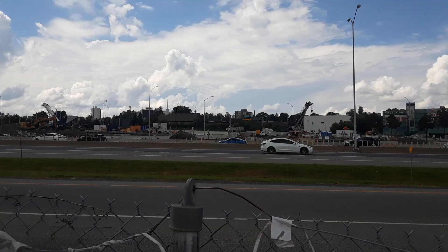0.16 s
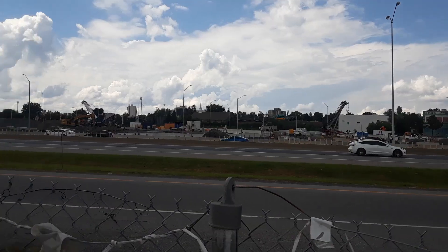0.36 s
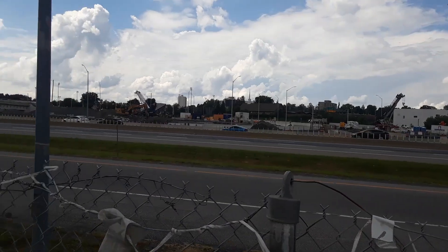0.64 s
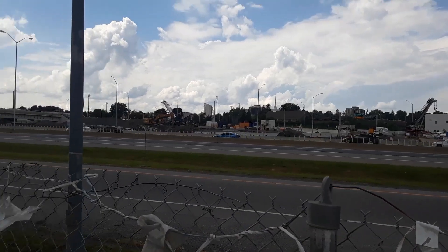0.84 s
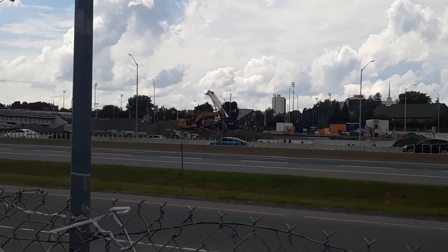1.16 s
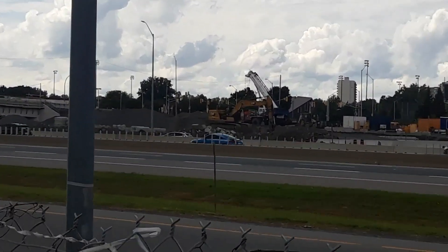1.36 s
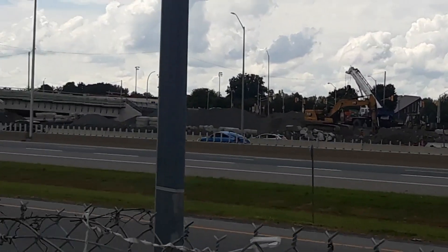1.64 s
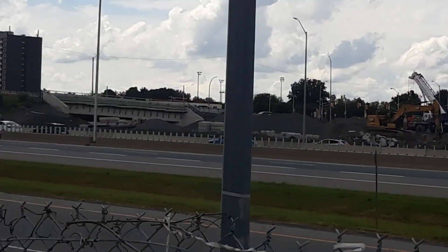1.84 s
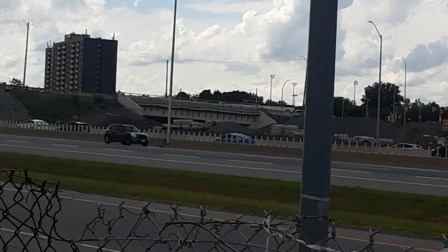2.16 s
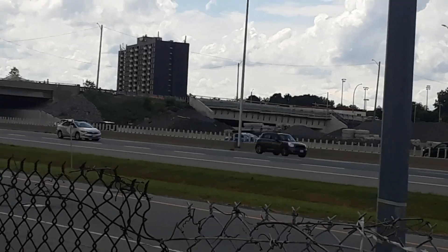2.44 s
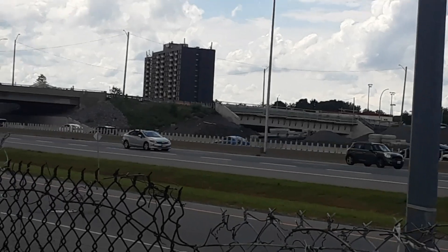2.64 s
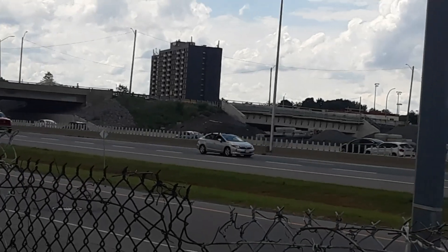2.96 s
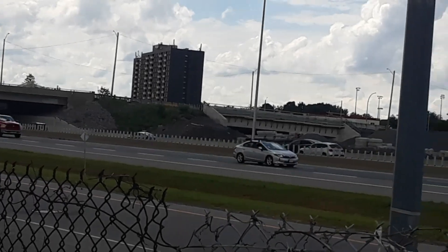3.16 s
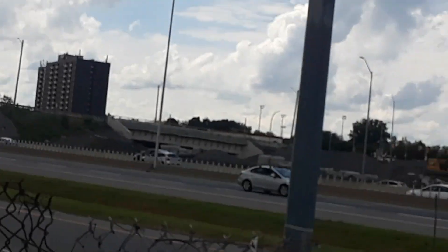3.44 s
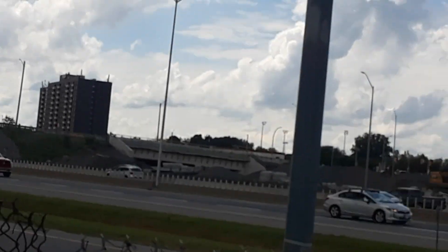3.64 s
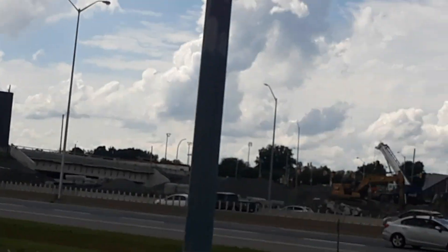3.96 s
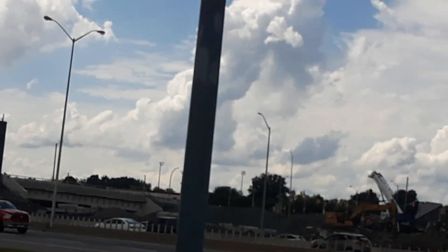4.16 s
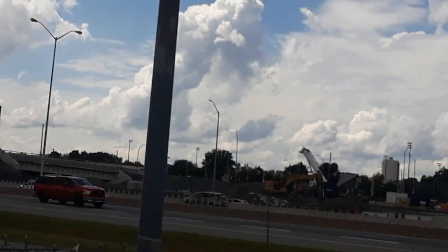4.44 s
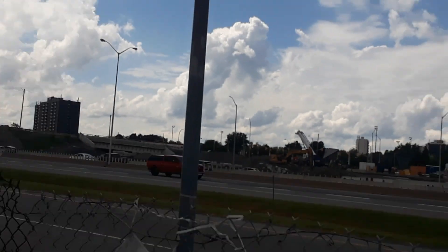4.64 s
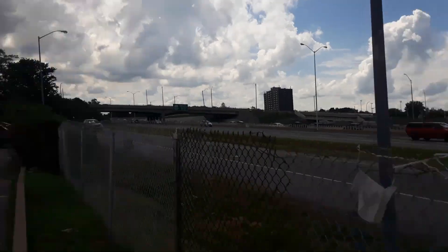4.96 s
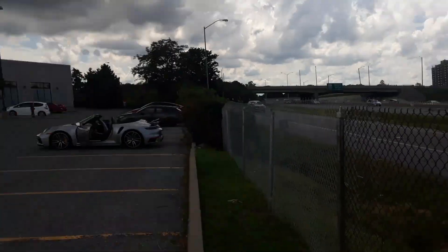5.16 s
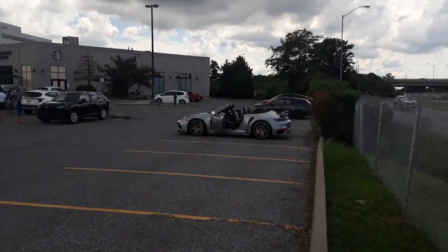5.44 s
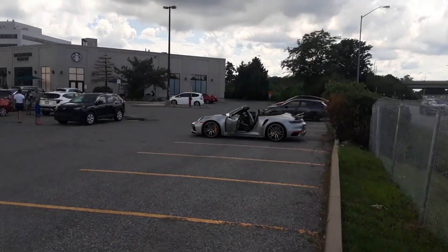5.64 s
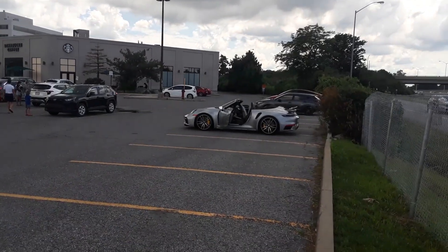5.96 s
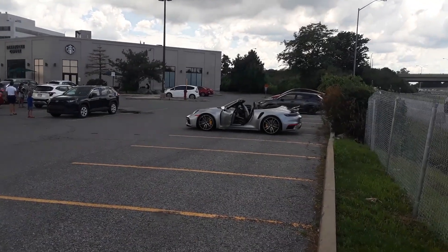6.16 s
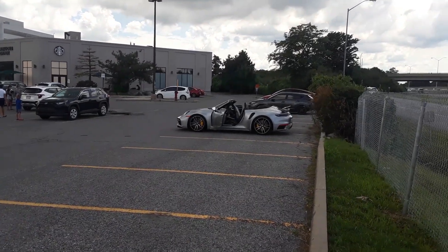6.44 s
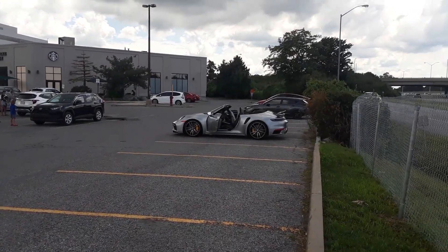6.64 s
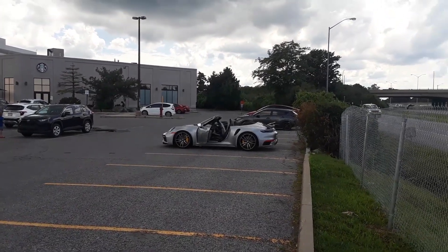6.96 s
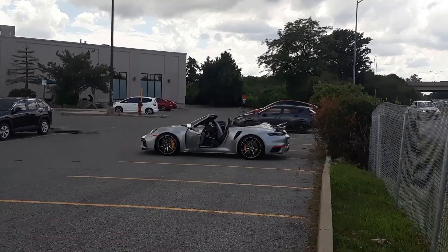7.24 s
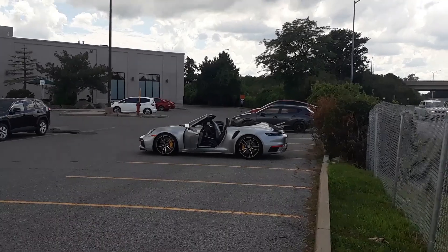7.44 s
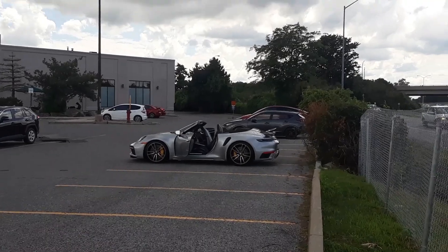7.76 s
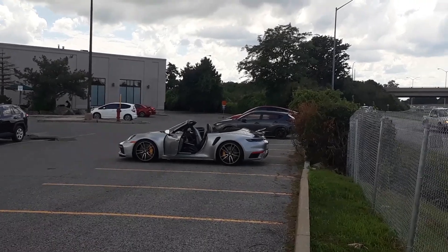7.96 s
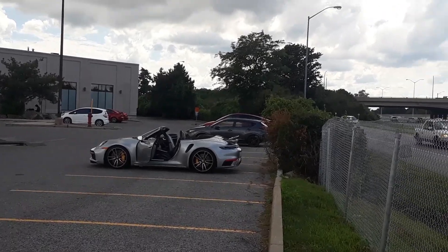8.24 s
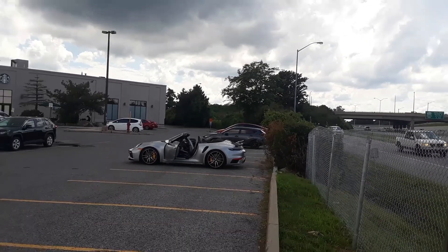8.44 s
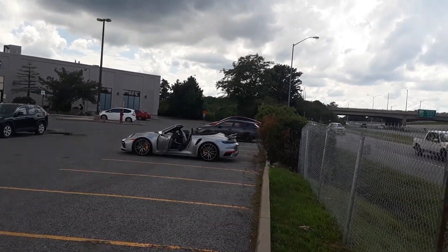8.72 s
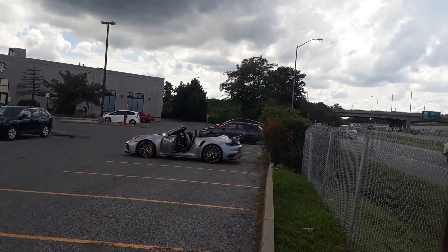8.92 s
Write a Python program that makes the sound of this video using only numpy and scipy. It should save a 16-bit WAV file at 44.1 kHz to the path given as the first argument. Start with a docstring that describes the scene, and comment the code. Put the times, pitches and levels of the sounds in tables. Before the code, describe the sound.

A lumpy wind gust fades in a fraction of a second, a tiny silent cut follows, then dense highway traffic starts abruptly: low engine rumble, mid tyre roar, whine and soft hiss. Single cars swell and fade, wind thumps knock one side or the other of the handheld phone. In the last third a vehicle draws near with a rising tyre note and quick regular slaps, still loud at the end.

```python
"""Busy highway on a hand-held phone

Two microphone ports beside traffic: shaped noise bands rumble, roar and hiss, arriving first at the right.
A vehicle draws near: a swelling tyre note, and noise bursts for something slapping on a wheel once a turn.
Enveloped low noise makes wind puffs, single pressure cycles make thumps on one port or the other.
It opens with a fading gust (lumpy noise) in a quieter place and a short silent cut."""
import sys
import numpy as np
from scipy import signal
from scipy.fft import rfft, irfft, next_fast_len
from scipy.io import wavfile
from scipy.ndimage import uniform_filter1d, map_coordinates

SR = 44100
rng = np.random.default_rng(int(sys.argv[2]) if len(sys.argv) > 2 else 0)


def digitize_waveform(pressure):
    """Quantize a signal to 16-bit integers and store it at the path in sys.argv[1].

    Rows of a 2-D input are taken as channels; values are limited to [-1, 1].
    """
    field = np.atleast_2d(pressure).T
    bounded = np.clip(field, -1, 1)
    quanta = np.round(bounded * 32767).astype(np.int16)
    wavfile.write(sys.argv[1], SR, quanta)


def undo_db(level):
    """Turn decibels back into plain size, where 20 dB means ten times bigger."""
    steps = np.asarray(level, float) / 20
    return 10 ** steps


N = 400869


def unit(x):
    """Scale to rms 1."""
    return x / np.sqrt(np.mean(np.abs(x) ** 2) + 1e-20)


def along(points, hz):
    """(f/Hz, value) points read on a log frequency axis."""
    f, v = np.transpose(points)
    return np.interp(np.log(hz + 1), np.log(f + 1), v)


def curves(rows, t):
    """Each column after the time, read at times t."""
    s, *cols = np.transpose(rows)
    return [np.interp(t, s, c) for c in cols]


def wobble(t, rate):
    """A smooth random curve, rate knots a second, zero past its 150 knots."""
    return map_coordinates(rng.standard_normal(150), t[None] * rate)


def coloured(spectrum, size, channels=2):
    """Unrelated noises of joint rms 1 with the given spectrum."""
    m = next_fast_len(size + 8192)
    gain = undo_db(along(spectrum, np.fft.rfftfreq(m, 1 / SR)))
    noise = irfft(rfft(rng.standard_normal((channels, m))) * gain, m)
    return unit(noise[:, :size])


def ports(x, pan_db, late_s):
    """One sound at both ports: the left one is farther from the road."""
    late = round(late_s * SR)
    left = np.pad(x, (late, 0))[:len(x)]
    return np.array([left * undo_db(pan_db / 2), x * undo_db(-pan_db / 2)])


def band(shape, db):
    """Power density of the given shape with rms level db."""
    return shape / shape.mean(0) * undo_db(2 * db)


def spectrum_power(spectrum, hz):
    """Power shape from a spectrum in dB."""
    return undo_db(2 * along(spectrum, hz))


def hump(hz, centre_hz, width):
    """Bell-shaped power on a log frequency axis; width in nepers."""
    return np.exp(-(np.log((hz + 1) / centre_hz) / width) ** 2)


# gust and quiet floor from t = 0 to the cut; silence: [from t/s, to t/s]
CUT_S = (.1699, .2538)
# opening gust: [t/s, left level/dB, right level/dB, flap level/dB]
GUST_LEVELS = [(0, -11.5, -15, -42), (.02, -17.5, -24.5, -34), (.04, -17, -18.5, -35.5),
               (.07, -22, -20.5, -40), (.1, -29, -43.5, -51), (.125, -46, -27, -37), (.15, -58, -48, -44),
               (.168, -30, -37, -46)]
# gust spectrum: [f/Hz, level/dB]
GUST_SPECTRUM = [(24, -79), (40, -33.5), (200, -19.5), (284, -1.5), (329, -6), (466, -6.5), (514, -21.5),
                 (568, -11.5), (888, -33), (8070, -91), (15000, -76)]
# brighter flapping spectrum: [f/Hz, level/dB]
FLAP_SPECTRUM = [(100, -62), (500, -5), (900, -3), (1400, -11.5), (2000, -24), (6000, -120)]
# quiet floor spectrum: [f/Hz, level/dB]
QUIET_SPECTRUM = [(24, -46), (40, 2), (233, 3.5), (443, -20), (1570, -27), (2170, -18), (4790, -34),
                  (8270, -50), (15000, -63.5)]


def opening():
    """A lumpy gust on both ports falls away over a quiet floor; brighter flapping shares its lumps."""
    t = np.arange(round(CUT_S[0] * SR)) / SR
    size = len(t)
    left_db, right_db, flap_db = curves(GUST_LEVELS, t)
    lumps = np.array([wobble(t, rate=136), wobble(t, rate=75)])
    gust = undo_db([left_db, right_db]) * unit(undo_db(2.5 * lumps) * coloured(GUST_SPECTRUM, size))
    flap = undo_db(flap_db) * unit(undo_db(5.2 * lumps) * coloured(FLAP_SPECTRUM, size))
    floor = undo_db(-38) * coloured(QUIET_SPECTRUM, size)
    return np.pad(gust + flap + floor, ((0, 0), (0, N - size)))


# traffic stream, also read by tyres and hiss:
# [t/s, engine rumble level/dB, tyre roar level/dB, tread whine level/dB, spray hiss level/dB]
TRAFFIC_LEVELS = [(.26, -34, -24.5, -25.5, -50.5), (.55, -30.5, -24.5, -23.5, -46.5),
                  (1.07, -29, -23.5, -22.5, -46.5), (1.6, -30, -23.5, -24.5, -50.5),
                  (2.4, -30, -21.5, -24.5, -49.5), (2.85, -31.5, -23, -21.5, -45.5),
                  (3.1, -29, -25, -24.5, -49), (3.33, -34, -21.5, -22, -44.5),
                  (3.7, -28, -24.5, -22.5, -47), (3.95, -29.5, -22, -23.5, -44),
                  (4.6, -27, -29, -20, -45.5), (5.23, -27, -26.5, -22, -45), (5.84, -28, -25.5, -24.5, -49),
                  (6.7, -29.5, -23, -23, -43.5), (7.39, -26.5, -24, -22, -42.5),
                  (7.9, -25.5, -21.5, -22.5, -44), (8.5, -26, -23, -22, -41.5), (9.09, -24, -27, -20, -40)]
# drifting exhaust drone over a low engine hum: [t/s, drone f/Hz, drone level/dB, hum level/dB]
DRONE_HUM = [(.26, 300, -37, -39), (2, 307, -38, -38.5), (3, 314, -33, -36), (4, 278, -30, -34.5),
             (5.2, 314, -31, -40), (6, 298, -30, -42), (7, 222, -31.5, -31), (7.4, 244, -28.5, -31),
             (8, 241, -42, -31), (8.5, 217, -25.5, -27), (9.09, 197, -28, -34.5)]
# engine rumble spectrum: [f/Hz, level/dB]
RUMBLE_SPECTRUM = [(20, -17.5), (70, 4), (120, -0.5), (170, 6.5), (250, 3), (400, 1), (550, -7.5),
                   (900, -15.5), (1500, -38.5), (4000, -120)]


def engines(hz, t):
    """Engines sum to a broad rumble, a drifting exhaust drone and a narrow hum."""
    hum_hz = 119.6
    rumble_db = curves(TRAFFIC_LEVELS, t)[0]
    drone_hz, drone_db, hum_db = curves(DRONE_HUM, t)
    rumble = band(spectrum_power(RUMBLE_SPECTRUM, hz), rumble_db + 0.51 * wobble(t, rate=9))
    drone = band(hump(hz, drone_hz, width=.15), drone_db + 0.33 * wobble(t, rate=8.3))
    hum = band(hump(hz, hum_hz, width=0.05), hum_db + 1.1 * wobble(t, rate=18))
    return rumble + drone + hum


# nearing vehicle, also read by slaps: [t/s, tyre note f/Hz, note level/dB, slap level/dB, slap centre f/Hz]
NEARING_VEHICLE = [(5.7, 880, -45, -45, 5400), (6.6, 840, -29, -44, 5400), (7.05, 770, -25.5, -35.5, 5500),
                   (7.35, 845, -25.5, -37.5, 5170), (7.7, 850, -25.5, -32, 5400),
                   (7.95, 840, -26.5, -31, 5640), (8.2, 840, -23, -27.5, 5770),
                   (8.45, 840, -21.5, -26.5, 5650), (8.52, 844, -21.5, -21.5, 5650),
                   (8.65, 830, -15.5, -23, 5450), (8.78, 814, -17, -16.5, 5100),
                   (8.9, 830, -18.5, -19, 5150), (9.09, 822, -18, -18, 5160)]
# tread whine spectrum: [f/Hz, level/dB]
WHINE_SPECTRUM = [(200, -120), (600, -7.5), (1000, 1), (1400, 0.5), (2000, -2.5), (2600, -8), (3200, -17.5),
                  (4000, -25), (5000, -73), (9000, -120)]


def tyres(hz, t, flutter):
    """Tyres sum to a slowly sinking roar and a tread whine; the nearing vehicle adds its own note."""
    roar_start_hz, roar_sag_hz_per_s = 912, 9.4
    roar_hz = roar_start_hz - roar_sag_hz_per_s * t
    roar_db, whine_db = curves(TRAFFIC_LEVELS, t)[1:3]
    note_hz, note_db = curves(NEARING_VEHICLE, t)[:2]
    roar_db = roar_db + .5 * flutter + 0.21 * wobble(t, rate=15)
    whine_db = whine_db + .5 * flutter + 0.17 * wobble(t, rate=13.0)
    roar = band(hump(hz, roar_hz, width=0.55), roar_db)
    note = band(hump(hz, note_hz, width=0.15), note_db + .5 * flutter)
    whine = band(spectrum_power(WHINE_SPECTRUM, hz), whine_db)
    return roar + note + whine


# single cars' tyre notes: [loudest t/s, time to fall 6 dB t/s, note f/Hz, level/dB]
CAR_PASSES = [(.9, .4, 970, -27.5), (2, 0.21, 980, -31.5), (2.8, 0.16, 1240, -29),
              (3.35, 0.35, 1110, -26.5), (4.3, 0.29, 870, -29), (4.85, 0.88, 896, -28.5)]
# short rising tyre swishes: [loudest t/s, half length t/s, from f/Hz, to f/Hz, level/dB]
TYRE_SWISHES = [(4.397, 0.079, 1400, 2140, -23.5), (4.81, 0.063, 1700, 2200, -27),
                (5.195, 0.093, 1870, 2320, -27.5), (7.396, 0.15, 1800, 2180, -26.5)]


def passes(hz, t, flutter):
    """Single cars' narrow tyre notes swell and fade; shorter swishes also rise in pitch."""
    power = 0
    for s, length_s, pass_hz, db in CAR_PASSES:
        u = (t - s) / length_s
        power = power + band(hump(hz, pass_hz, width=0.091), db - 6 * u ** 2 + .5 * flutter)
    for s, length_s, from_hz, to_hz, db in TYRE_SWISHES:
        u = (t - s) / length_s
        swish_hz = np.interp(u, [-1, 1], [from_hz, to_hz])
        power = power + band(hump(hz, swish_hz, width=0.12), db - 6 * u ** 2)
    return power


# hiss centre, moving as the phone turns: [t/s, f/Hz]
HISS_CENTRE_HZ = [(0.26, 5070), (0.62, 4830), (3.04, 5200), (3.26, 5470), (4.15, 4870), (4.27, 5200),
                  (6.25, 5030), (7.5, 5150)]
# hiss spectrum, before shifting to its centre: [f/Hz, level/dB]
HISS_SPECTRUM = [(800, -120), (2000, -19.5), (3000, -12), (4200, -7.5), (5300, -5), (6200, -8.5),
                 (7200, -17), (8500, -30), (10000, -60), (14000, -120)]
# faint top, relative to hiss: [t/s, air level/dB, sheen level/dB]
TOP_LEVELS = [(.3, -32, -30.5), (2.35, -33, -27.5), (3.1, -32.5, -28), (3.5, -29, -28.5), (5.3, -28.5, -27),
              (6, -28, -31), (7.1, -27, -23), (8.3, -23, -20.5), (9.09, -23.5, -27.5)]
# air spectrum: [f/Hz, level/dB]
AIR_SPECTRUM = [(3000, -120), (6000, -30), (8000, -6), (9000, -1), (10500, 1), (12000, 2.5), (13500, -13.5),
                (15500, -8.5), (17000, -41)]
# sheen at the ports' high resonance, also read by slaps: [f/Hz, level/dB]
SHEEN_SPECTRUM = [(8000, -120), (11500, -19), (13000, 0), (14000, -1), (15600, -11), (17000, -38.5)]


def hiss(hz, t, flutter):
    """Spray hiss with a moving centre, topped by faint air and the ports' high resonance."""
    tabled_centre_hz = 5300
    hiss_db = curves(TRAFFIC_LEVELS, t)[3]
    air_db, sheen_db = curves(TOP_LEVELS, t)
    shifted_hz = hz * tabled_centre_hz / curves(HISS_CENTRE_HZ, t)[0]
    spray_db = hiss_db + 0.35 * flutter + 0.8 * wobble(t, rate=12)
    air_db = hiss_db + air_db + .7 * flutter + 1.1 * wobble(t, rate=15)
    sheen_db = hiss_db + sheen_db + .7 * flutter + 1.1 * wobble(t, rate=10)
    spray = band(spectrum_power(HISS_SPECTRUM, shifted_hz), spray_db)
    air = band(spectrum_power(AIR_SPECTRUM, hz), air_db)
    sheen = band(spectrum_power(SHEEN_SPECTRUM, hz), sheen_db)
    return spray + air + sheen


# direction and nearness: [t/s, left port delay/ms, share from one direction/0-1, left-right level/dB]
BEARINGS = [(.26, 0.39, .8, 0.5), (1, 0.43, 1, 0.6), (2, 0.33, 0.81, -0.5), (3, 0.29, 0.55, -0.5),
            (4, 0.35, 0.62, 0), (5, 0.37, 0.73, 0.3), (6, 0.3, 0.78, 0.5), (7, 0.35, 0.91, 0.6),
            (8, 0.33, 0.86, 0.3), (9.09, 0.28, 0.97, 0)]
# likeness of the ports after scatter from lanes and walls: [f/Hz, likeness/0-1]
PORT_LIKENESS = [(60, 1), (300, 1), (700, .99), (1100, .87), (1700, .72), (2500, .38), (3500, .15),
                 (4800, .3), (6200, .1), (14000, .05)]
# long waves bend round the phone and arrive less late: [f/Hz, share of delay/0-1]
DELAY_SHARE = [(100, 0.36), (500, 0.66), (900, 0.72), (1300, 0.8), (1800, 0.96)]
# ports sit differently in the phone body: [f/Hz, extra left-right level/dB]
PORT_TILT_DB = [(60, -1), (300, -0.5), (900, 1), (2500, 1.5), (3300, -1), (5000, 5), (9000, 1), (14000, 3)]


def at_ports(noise, hz, t):
    """Two noise spectra become partly alike ports with a delay and a level difference."""
    late_ms, direct, pan_db = curves(BEARINGS, t)
    likeness = along(PORT_LIKENESS, hz) * direct ** np.clip(hz / 900, 0, 1)
    turn = np.arccos(np.clip(likeness, 0, 1)) / 2
    mid, side = noise[0] * np.cos(turn), noise[1] * np.sin(turn)
    # half of the delay on each side
    lag = np.exp(-1j * np.pi * hz * along(DELAY_SHARE, hz) * late_ms / 1000)
    pan_db = pan_db + along(PORT_TILT_DB, hz)
    left = (mid + side) * lag * undo_db(pan_db / 2)
    right = (mid - side) / lag * undo_db(-pan_db / 2)
    return np.array([left, right])


def traffic():
    """Many vehicles sum to noise; each part of their sound has its own band, swell and flutter."""
    frame = 2048
    hz, t, noise = signal.stft(rng.standard_normal((2, N)), SR, nperseg=frame)
    hz = hz[:, None]
    # turbulent air on the way shakes most tyre bands and the hiss together
    flutter = wobble(t, rate=7.6)
    power = engines(hz, t) + tyres(hz, t, flutter) + hiss(hz, t, flutter) + passes(hz, t, flutter)
    patches = uniform_filter1d(rng.standard_normal(power.shape), size=14, axis=0)
    patches = unit(uniform_filter1d(patches, size=4, axis=1))
    shaped = at_ports(noise, hz, t) * np.sqrt(power) * undo_db(0.8 * patches)
    return signal.istft(shaped, SR, nperseg=frame)[1][:, :N]


# longer wind puffs: [onset t/s, peak level/dB, left-right level/dB, length t/s]
WIND_PUFFS = [(1.771, -22, 21, 0.037), (3.285, -25, -27, 0.041), (3.328, -17.5, -16, .05),
              (3.45, -22, -13, 0.11), (3.61, -16, -29, 0.038), (3.653, -25, -20, 0.024),
              (3.706, -17, -16, 0.042), (4.63, -14.5, 2, .078), (4.925, -18, -11, 0.0087),
              (5.208, -14, -16, 0.033)]
# wind spectrum: [f/Hz, level/dB]
BUFFET_SPECTRUM = [(20, -15), (50, -9), (110, 5.5), (250, -3.5), (450, -8), (900, -13.5), (2000, -78),
                   (5000, -120)]


def puffs():
    """Eddies buffet mostly one port; a faint buffeting, unrelated between ports, runs under them."""
    t = np.arange(N) / SR
    envelope = np.ones((2, N)) * undo_db(-42.0)
    for s, db, pan_db, length_s in WIND_PUFFS:
        u = np.clip((t - s) / length_s, 0, 30)
        swell = np.e * 2 * u * np.exp(-2 * u)  # peaks at 1, half a length in
        rms_db = db - 11.5  # noise rms lies below its peak
        envelope = envelope + undo_db(rms_db + np.array([[pan_db], [-pan_db]]) / 2) * swell
    return envelope * coloured(BUFFET_SPECTRUM, size=N)


# single sharp eddies: [t/s, peak level/dB, port/0 left 1 right]
EDDY_THUMPS = [(2.379, -11, 0), (2.434, -12, 0), (3.253, -4.5, 1), (3.859, -11, 1), (3.903, -13, 0)]


def thumps():
    """Each eddy is one push and rebound of pressure on one port, inward or outward by chance."""
    half_push_to_rebound_s = .0012
    t, out = np.arange(N) / SR, np.zeros((2, N))
    for s, db, port in EDDY_THUMPS:
        u = (t - s) / half_push_to_rebound_s
        out[round(port)] += rng.choice([-1, 1]) * undo_db(db) * u * np.exp((1 - u * u) / 2)
    return out


def blow(t, t60_s):
    """A burst envelope from t = 0: fast rise, then a fall by 60 dB at t60_s."""
    rise = 1 - np.exp(-np.abs(t) / 0.0014)
    return (t > 0) * rise * undo_db(-60 * (np.abs(t) / t60_s) ** 1.36)


# wheel rotation: [t/s, whole turns completed]
WHEEL_TURNS = [(6.929, 0), (7.1303, 3), (7.4697, 8), (7.749, 12), (7.89, 14), (8.106, 17), (8.2448, 19),
               (8.515, 23), (8.7838, 27), (9.0523, 31)]
# slap spectrum: [f/multiple of slap centre, level/dB]
SLAP_SPECTRUM = [(.1, -120), (.3, -33), (.65, -16), (.82, -9), (1, -5), (1.15, -9.5), (1.28, -17),
                 (1.5, -33.5), (2.3, -120)]
# slap's high sizzle spectrum: [f/Hz, level/dB]
SIZZLE_SPECTRUM = [(3000, -120), (6000, -37), (8000, -6.5), (9000, -11.5), (10500, -6), (12000, -6.5),
                   (14000, -7.5), (15600, -6), (17000, -35)]


def slaps():
    """A sharp hissing slap each wheel turn, weaker rattles following within the turn, partly scattered."""
    left_late_s = .000363
    scatter_db, scatter_pitch_share, top_scatter_db = 1.5, .04, 3.5  # from turn to turn
    sizzle_db, sheen_db = -23, -20.5  # relative to slap
    t = np.arange(SR // 10) / SR
    size = len(t)
    out = np.zeros((2, N + SR))
    when_s, turns = np.transpose(WHEEL_TURNS)
    times_s = np.interp(np.arange(turns[-1] + 1), turns, when_s)
    for s, db, centre_hz in zip(times_s, *curves(NEARING_VEHICLE, times_s)[-2:]):
        luck = rng.standard_normal(7)
        centre_hz = centre_hz * np.exp(scatter_pitch_share * luck[-1])
        direct, *scatter = coloured(np.multiply(SLAP_SPECTRUM, [centre_hz, 1]), size, channels=3)
        body = ports(direct, pan_db=3, late_s=left_late_s) + 1.02 * np.array(scatter)
        sizzle = undo_db(sizzle_db) * coloured(SIZZLE_SPECTRUM, size)
        sheen = undo_db(sheen_db) * coloured(SHEEN_SPECTRUM, size)
        top = undo_db(top_scatter_db * luck[-3]) * undo_db([[2], [-2]]) * (sizzle + sheen)
        slap = blow(t, t60_s=0.063)
        rattle = undo_db(-8 + 2.6 * luck[0]) * blow(t - .0265 - 0.0022 * luck[1], t60_s=0.03)
        late_rattle = undo_db(-11 + 1.8 * luck[2]) * blow(t - .049 - 0.0039 * luck[3], t60_s=0.029)
        shape = slap + rattle + late_rattle
        rms_db = db + scatter_db * luck[-2] - 7.5  # noise rms lies below its peak
        out[:, round(s * SR):][:, :size] += undo_db(rms_db) * shape * (body + top)
    return out[:, :N]


def scene():
    """The opening, the cut, then the roadside."""
    roadside = traffic() + puffs() + thumps() + slaps()
    return opening() + (np.arange(N) >= CUT_S[1] * SR) * roadside


def roll_off(x):
    """The treble ends steeply here."""
    return signal.sosfilt(signal.butter(12, 15750, fs=SR, output="sos"), x)


def record(dry):
    """The phone cuts the deep bass; the cut is held silent."""
    low_cut = signal.butter(N=3, Wn=66, btype="high", fs=SR, output="sos")
    t = np.arange(N) / SR
    audible = (t < CUT_S[0]) | (t >= CUT_S[1])
    mix = signal.sosfilt(low_cut, dry) * audible
    return roll_off(mix)


dry = scene()
out = record(dry)
digitize_waveform(out)
```